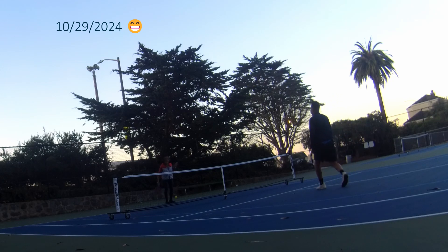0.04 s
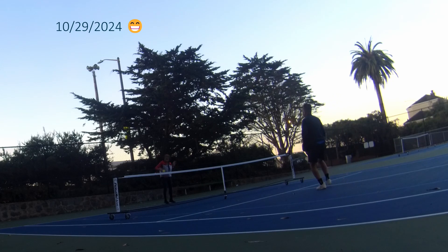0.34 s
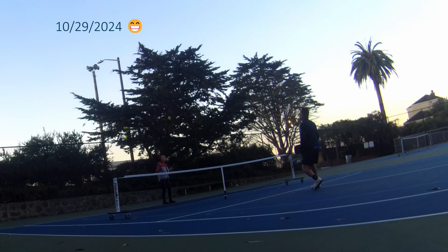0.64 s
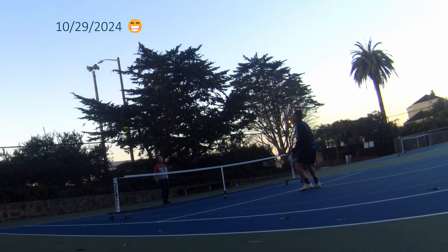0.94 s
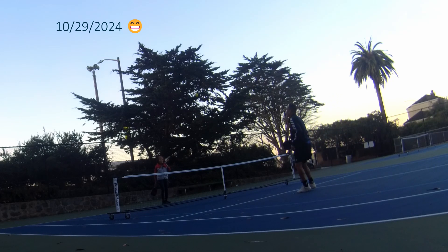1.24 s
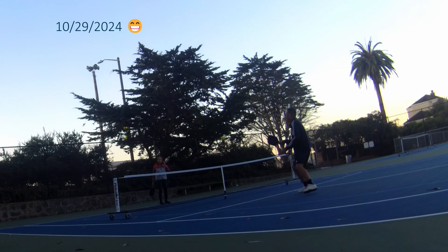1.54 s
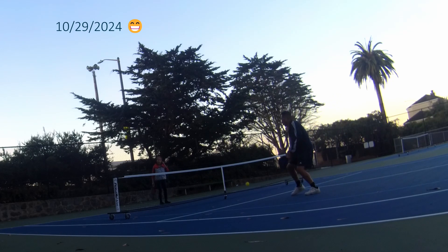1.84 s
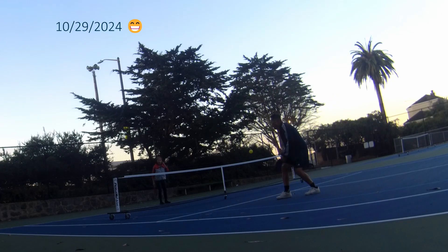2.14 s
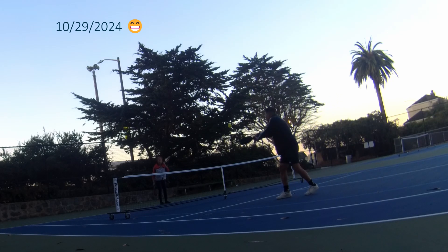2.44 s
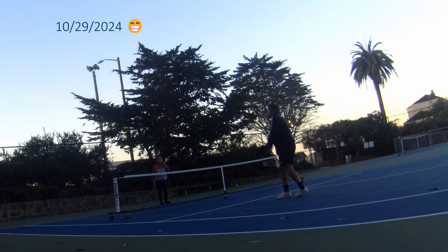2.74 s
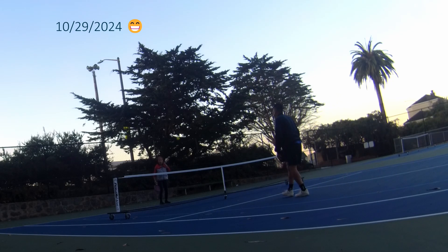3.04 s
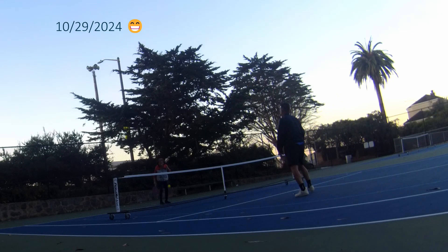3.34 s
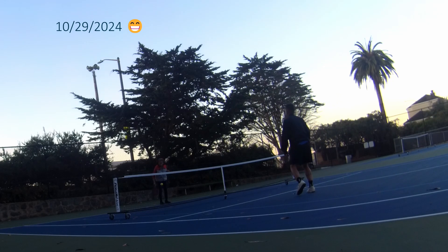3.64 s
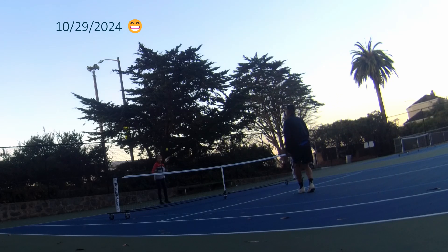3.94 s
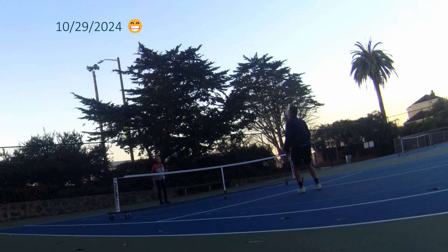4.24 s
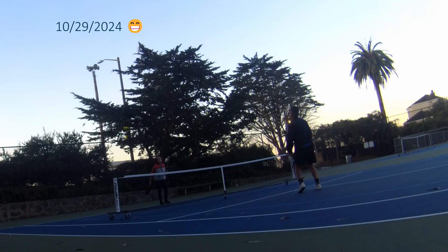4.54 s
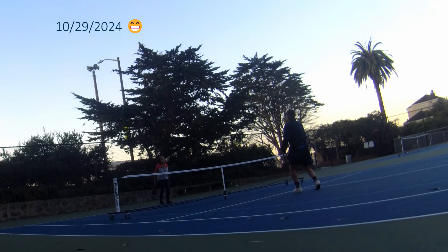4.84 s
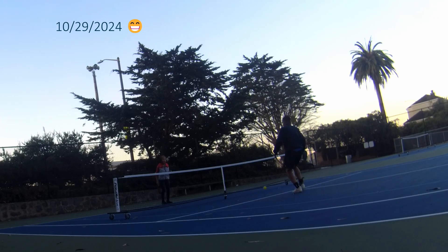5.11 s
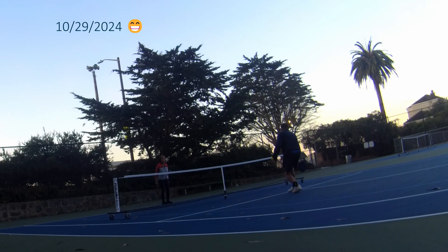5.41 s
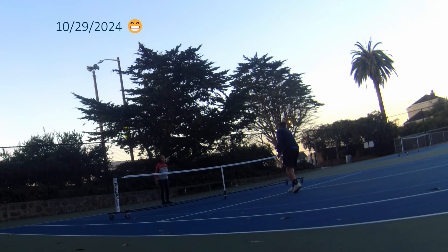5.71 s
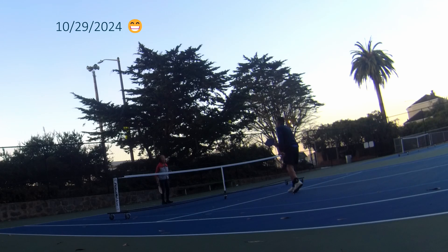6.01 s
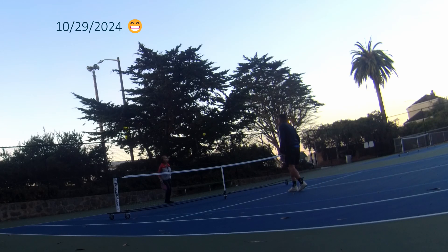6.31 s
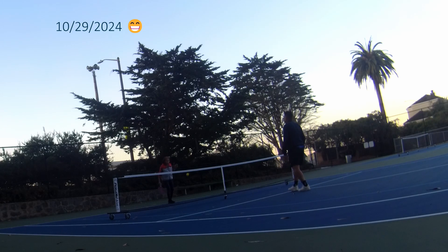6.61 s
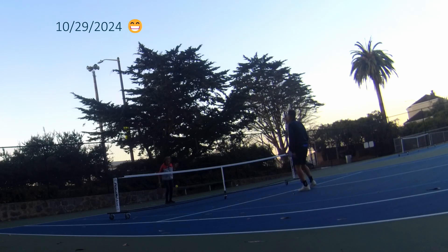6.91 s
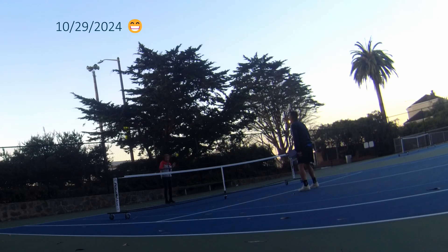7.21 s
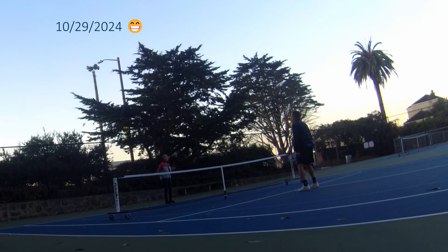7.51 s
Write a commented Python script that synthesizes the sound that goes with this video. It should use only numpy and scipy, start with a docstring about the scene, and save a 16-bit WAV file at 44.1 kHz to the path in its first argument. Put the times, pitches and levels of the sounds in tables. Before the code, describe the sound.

A plastic ball ticks on a court and pops off paddles five times with short echoes, above a soft town wash.

```python
"""A steady wash of distant town, a faint fading motor and the high hiss of a small camera on the ground.
Over them comes a slow pickleball rally on an outdoor court, far and near player in turn.
The hollow plastic ball ticks on the court, then pops off a paddle: each impact excites damped modes
and a burst of noise. A wall and a fence reflect each pop, and scattering adds a thin, dull tail."""
import sys
import numpy as np
from scipy import signal
from scipy.fft import rfft, irfft
from scipy.io import wavfile

SR = 44100
rng = np.random.default_rng(int(sys.argv[2]) if len(sys.argv) > 2 else 0)


def bounce(signal):
    """Save signal as a 16-bit WAV file at the path given by the first command-line argument."""
    frames = np.transpose(np.atleast_2d(signal))
    limited = np.clip(frames, -1, 1)
    pcm = np.round(limited * 32767).astype(np.int16)
    wavfile.write(sys.argv[1], SR, pcm)


N = 342216
TIME, RING_TIME = np.arange(N) / SR, np.arange(4096) / SR


def gain_of(db):
    """Amplitude grows tenfold every 20 dB."""
    return 10 ** (np.asarray(db) / 20)


def unit_rms(x):
    """Normalisation to a mean power of one."""
    return x / np.sqrt(np.mean(x ** 2) + 1e-20)


def coloured(x, spectrum):
    """Spectral shaping: gains in dB, interpolated on a log-frequency axis."""
    hz, db = np.transpose(spectrum)
    bins = np.fft.rfftfreq(len(x), 1 / SR)
    curve_db = np.interp(np.log(bins + 1), np.log(hz + 1), db)
    return irfft(rfft(x) * gain_of(curve_db), len(x))


def white():
    """White noise has a flat density, here 0 dB per Hz."""
    return rng.standard_normal(N) * np.sqrt(SR / 2)


def lowpass(x, hz):
    """A second-order filter loses 12 dB per octave above its cutoff."""
    return signal.sosfilt(signal.butter(2, hz, fs=SR, output="sos"), x)


def decay(t60, t=RING_TIME):
    """Exponential damping: 60 dB lost in t60 seconds."""
    return np.exp(-np.log(1000) * t / t60)


def mode(hz, t60, contact_s=0.00022):
    """A damped oscillator builds up during contact, then rings freely."""
    return np.cos(2 * np.pi * hz * RING_TIME) * decay(t60) * (1 - np.exp(-RING_TIME / contact_s))


def burst(spectrum, t60):
    """A broadband transient: coloured noise under exponential damping."""
    return unit_rms(coloured(rng.standard_normal(len(RING_TIME)), spectrum)) * decay(t60)


# The town's spectrum. Each row: frequency in Hz, density in dB per Hz.
TOWN_SPECTRUM = [(20, -95.5), (90, -95), (240, -98), (420, -100), (720, -100), (860, -95.5), (970, -88.5),
                 (1160, -94.5), (1380, -93.5), (1680, -107), (2100, -111), (2700, -112), (4000, -119),
                 (9000, -130)]
def town(swell_db=-0.56):
    """Far traffic sums incoherently to a gently swelling noise, with tyre roar near 1 kHz."""
    waves = [np.sin(2 * np.pi * (hz * TIME + rng.random())) / np.sqrt(hz)
             for hz in np.geomspace(.3, 6, 10)]
    return coloured(white(), TOWN_SPECTRUM) * gain_of(swell_db * unit_rms(sum(waves)))


def far_motor(hum_hz=224, waver_hz=4, start_db=-77, fade_db_per_s2=-11):
    """Random frequency modulation makes a faint hum unsteady; it fades ever faster."""
    knots = np.arange(0, N / SR, 0.1)
    hz = hum_hz + waver_hz * np.interp(TIME, knots, rng.standard_normal(len(knots)))
    level = gain_of(start_db + fade_db_per_s2 * TIME ** 2)
    return np.sqrt(2) * level * np.sin(2 * np.pi * np.cumsum(hz) / SR)


# Humps in the hiss. Each row: centre in Hz, width in Hz, peak density in dB per Hz.
HISS_HUMPS = [(7886, 316, -106.5), (8750, 60, -105.5), (11304, 475, -100.3), (12440, 270, -105),
              (13100, 15, -103), (12960, 62, -102.5), (13360, 340, -103.5), (14700, 240, -106)]
# Electronic whines. Each row: frequency in Hz, rms level in dB.
WHINE_TONES = [(7000, -104), (10000, -102), (14000, -95), (15000, -94)]
def camera_hiss(floor_db=-115):
    """Electronic self-noise: a flat floor and treble humps add in power, beside a few thin whines."""
    bins = np.fft.rfftfreq(N, 1 / SR)
    humps = sum(gain_of(db) ** 2 * np.exp(-.5 * ((bins - centre) / width) ** 2)
                for centre, width, db in HISS_HUMPS)
    hiss = irfft(rfft(white()) * np.sqrt(gain_of(floor_db) ** 2 + humps), N)
    whines = sum(np.sqrt(2) * gain_of(db) * np.sin(2 * np.pi * hz * TIME) for hz, db in WHINE_TONES)
    return hiss + whines


# The spectrum of a hard contact. Each row: frequency in Hz, relative level in dB.
CRACK_SPECTRUM = [(800, -16), (1600, -7), (3500, -12), (5700, -4), (6600, -6), (8800, -12), (10500, 3),
                  (12200, 2), (13700, -8), (15100, 3.5)]
def crack(t60=0.0086):
    """A brief contact spreads its energy far into the treble."""
    return burst(CRACK_SPECTRUM, t60)


# The tick of plastic on the court. Each row: frequency in Hz, relative level in dB.
TICK_SPECTRUM = [(300, -21), (1200, -7), (2300, 0.5), (3500, -6), (6000, -16), (15000, -22)]
# The ball's landings. Each row: start in seconds, then levels of ring, tick and hard edge in dB,
# each before its trim.
LANDINGS = [(0.091, -45, -67, -56), (1.836, -45.5, -66, -63), (3.523, -51, -63, -64),
            (5.162, -45.5, -71, -62)]
def bounces(ring_hz=1015, ring_trim_db=2, tick_trim_db=2, edge_trim_db=-3):
    """Impact on a rigid court: only the ball vibrates, with a light tick and a few cycles of ring."""
    out = np.zeros(N)
    for start, ring_db, tick_db, edge_db in LANDINGS:
        ring = gain_of(ring_db + ring_trim_db) * mode(ring_hz, t60=0.011)
        tick = gain_of(tick_db + tick_trim_db) * burst(TICK_SPECTRUM, t60=0.016)
        edge = gain_of(edge_db + edge_trim_db) * crack(t60=0.0098)
        add(out, start, ring + tick + edge)
    return out


def add(mix, start, sound):
    """Superposition: a sound adds to the mix from its start in seconds."""
    part = mix[max(round(start * SR), 0):][:len(sound)]
    part += sound[:len(part)]


def scatter(x, wet_db=-15, t60=0.5, dull_hz=2500, echoes_per_s=1500):
    """Diffuse scattering: fences and trees return a thin, dull tail."""
    t = np.arange(SR // 2) / SR
    taps = rng.standard_normal(len(t)) * (rng.random(len(t)) < echoes_per_s / SR) * decay(t60, t)
    tail = signal.fftconvolve(x, taps / np.linalg.norm(taps))[:N]
    return gain_of(wet_db) * lowpass(tail, dull_hz)


# Upper modes of ball and paddle. Each row: frequency in Hz, dB against the main ring, t60 in seconds.
UPPER_MODES = [(1176, -11, 0.051), (1900, -20, 0.011), (2660, -26, 0.015), (4600, -30, 0.0093),
               (6610, -22.5, 0.012)]
def ball(ring_hz, cutoff_s=0.014):
    """Shell resonance: the hollow ball's main ring dies ever faster, beneath short upper modes."""
    ring = mode(ring_hz, t60=0.047, contact_s=0.0012) * np.exp(-(RING_TIME / cutoff_s) ** 4)
    return ring + sum(gain_of(db) * mode(hz, t60) for hz, db, t60 in UPPER_MODES)


# Low modes of the face. Each row: frequency in Hz at pitch factor 1, relative level in dB, t60 in seconds.
FACE_MODES = [(236, -20, 0.014), (335, -6, 0.018), (630, 1, 0.013)]
def paddle_face(pitch, lowest_hz=170):
    """Plate modes give a short, low knock; so small a radiator sheds little bass."""
    knock = sum(gain_of(db) * mode(hz * pitch, t60) for hz, db, t60 in FACE_MODES)
    return signal.sosfilt(signal.butter(2, lowest_hz, "high", fs=SR, output="sos"), knock)


def reflection(sound, dull_hz=2200, rise_s=0.00056):
    """Rough-surface reflection loses treble, and its many path lengths soften the attack."""
    return (1 - np.exp(-RING_TIME / rise_s)) * lowpass(sound, dull_hz)


# The paddles, far then near. Each row: pitch factor of the face, contact in seconds, ball's ring in Hz.
PLAYER_PADDLES = [(0.96, 0.001327, 1035), (0.87, .0017, 1054)]
# Echo paths, far player then near. Each row: gain of the knock within the wall's echo in dB,
# gain of the fence's echo in dB, its delay in seconds.
ECHO_PATHS = [(2, -14, 0.063), (-3.5, -6.5, .1035)]
# The strokes, far and near in turn. Each row: start in seconds, strength in dB, extra knock in dB,
# delay of the wall's echo in seconds, its gain in dB.
RALLY_STROKES = [(0.4036, 0.5, 0, 0.042, -10), (2.3615, 0.5, 1.5, 0.0678, -7), (3.8615, -3, 0, 0.035, -12),
                 (5.7013, -4.5, -0.5, 0.0607, -1.5), (7.1995, -1, -7.5, 0.037, -5)]
def strokes(ball_db=-37.5, knock_db=-39, crack_db=-46.5, release_db=-4, fence_knock_db=-15):
    """Impact excitation: the ball cracks and rings, the face knocks on release, wall and fence echo."""
    out = np.zeros(N)
    for turn, (start, strength_db, face_db, wall_delay, wall_db) in enumerate(RALLY_STROKES):
        pitch, contact_s, ring_hz = PLAYER_PADDLES[turn % 2]
        wall_knock_db, fence_db, fence_delay = ECHO_PATHS[turn % 2]
        ring = gain_of(ball_db + strength_db) * ball(ring_hz)
        knock = gain_of(knock_db + strength_db + face_db) * paddle_face(pitch)
        # Harder strokes are brighter, glancing ones rounder.
        crack_gain = gain_of(crack_db + 1.5 * strength_db + 0.3 * face_db)
        add(out, start, crack_gain * crack())
        add(out, start + 0.0005, ring)
        add(out, start + contact_s, knock + crack_gain * gain_of(release_db) * crack())
        wall_echo = reflection(ring + gain_of(wall_knock_db) * knock)
        fence_echo = reflection(ring + gain_of(fence_knock_db) * knock)  # most knock passes through
        add(out, start + wall_delay, gain_of(wall_db) * wall_echo)
        add(out, start + fence_delay, gain_of(fence_db) * fence_echo)
    return out


def scene():
    """The rally, its scattered tail and the background superpose in one channel."""
    rally = bounces() + strokes()
    return (town() + far_motor() + camera_hiss() + rally + scatter(rally))[None]


def record(dry, offset=-0.0044, edge_hz=15330):
    """Band limiting: the camera adds a small constant offset and cuts the highest treble."""
    band_limit = signal.firwin(1023, edge_hz, window=("kaiser", 9), fs=SR)
    return signal.oaconvolve(dry + offset, band_limit[None], "same")


dry = scene()
out = record(dry)
bounce(out)
```